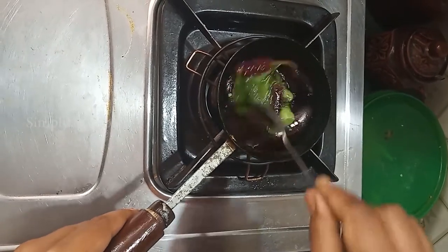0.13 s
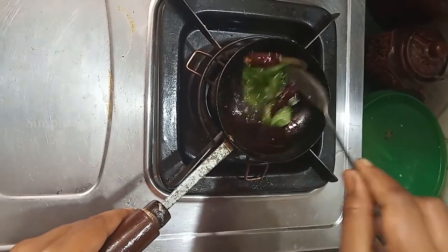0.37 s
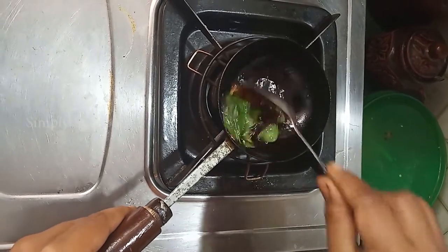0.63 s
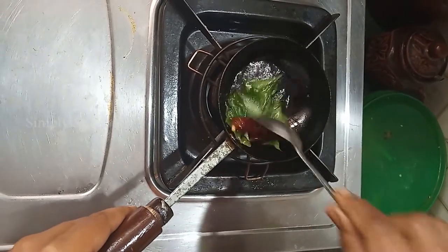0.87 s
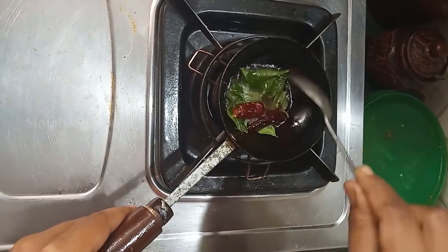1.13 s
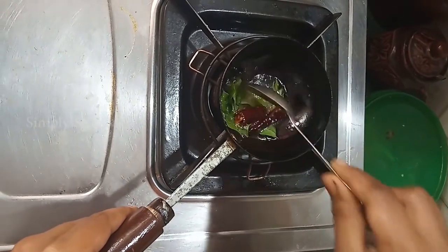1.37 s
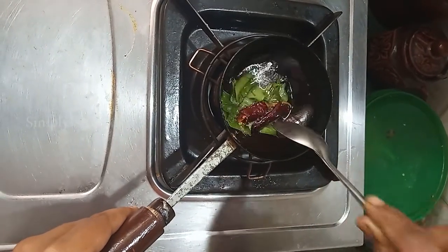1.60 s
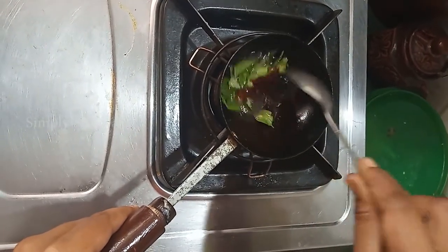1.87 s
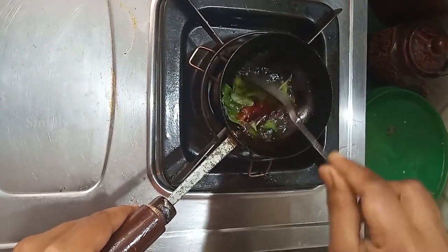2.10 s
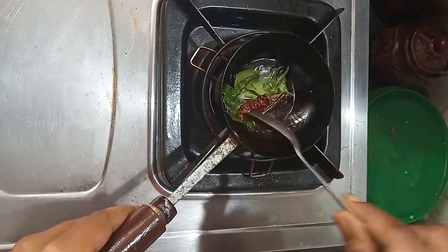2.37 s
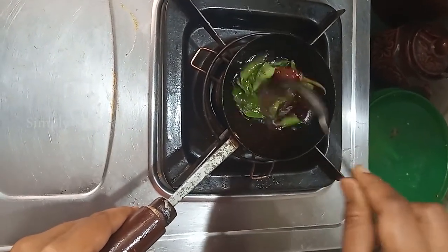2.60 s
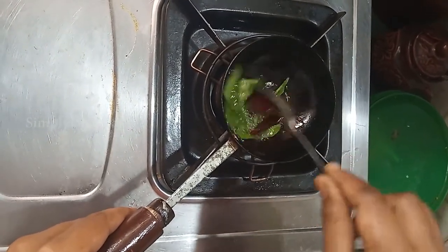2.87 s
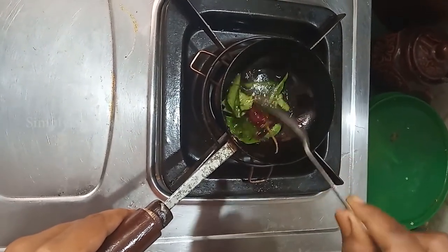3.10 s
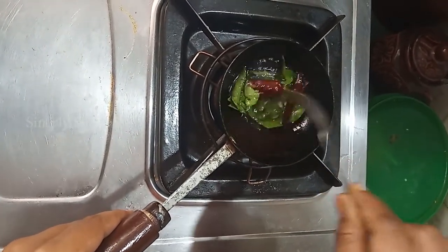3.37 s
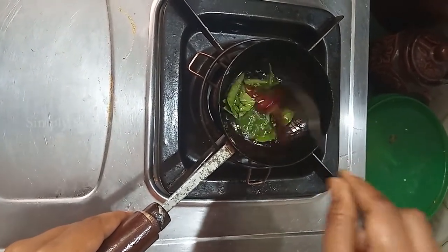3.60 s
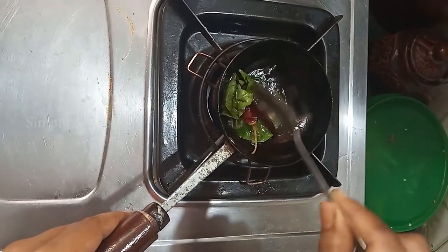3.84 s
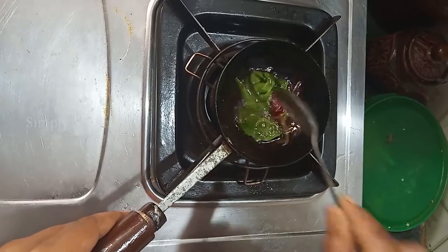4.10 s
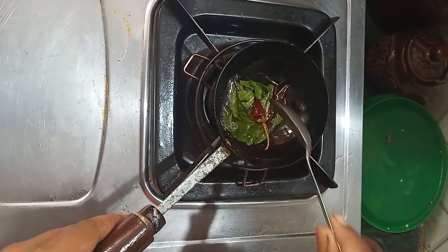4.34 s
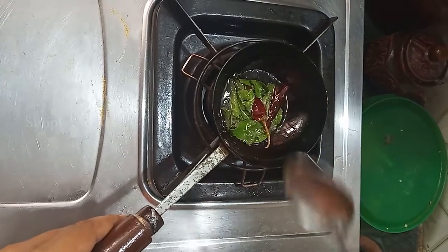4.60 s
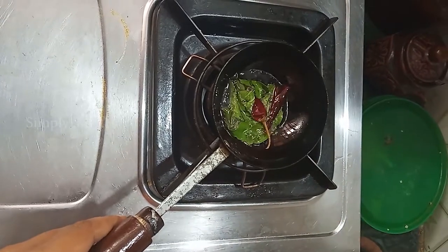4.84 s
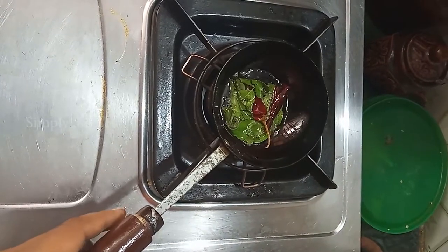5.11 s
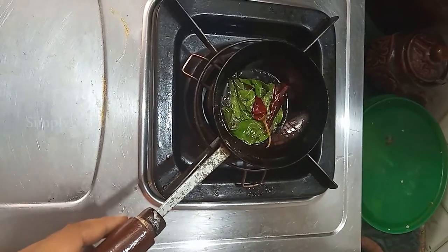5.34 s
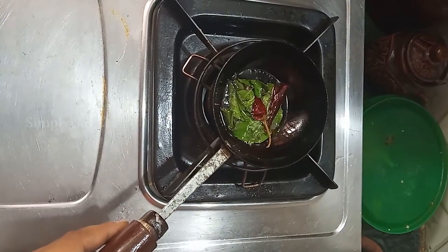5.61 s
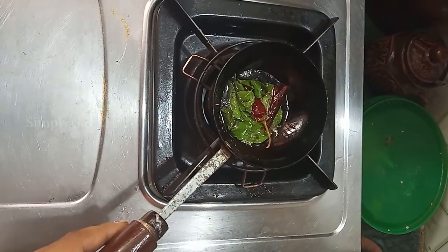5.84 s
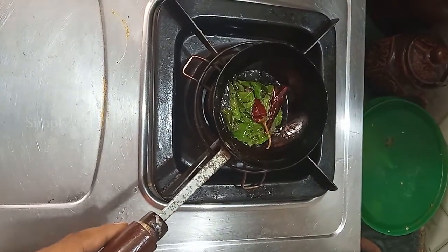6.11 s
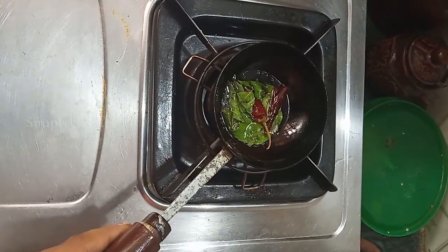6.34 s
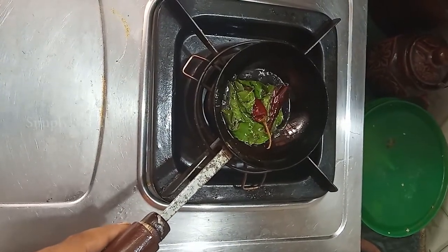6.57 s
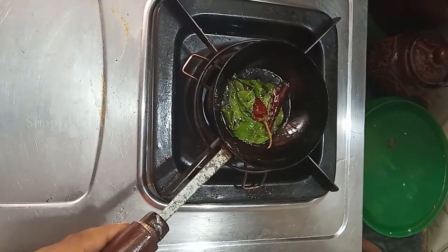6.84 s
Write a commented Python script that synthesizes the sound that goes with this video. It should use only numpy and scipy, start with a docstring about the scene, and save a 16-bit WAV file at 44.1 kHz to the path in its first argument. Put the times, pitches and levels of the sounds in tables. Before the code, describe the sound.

Close to a small metal pan in a home kitchen, hot oil hisses and crackles throughout. From 0 s a spoon knocks and rubs the pan, with short dull rings, while a far bird hoots and a low motor hum wavers below. The sizzle flares with each stir, most strongly around 0.8, 1.1 and 1.6 s, where loud, sharp water pops burst. A bigger bird's gliding whistle peaks at 2.0 s, returning near 4.7 and 6.7 s. From 2.6 to 4.6 s a songbird repeats a rapid four-note phrase about every 0.3 s, with soft outdoor echoes. Flares and knocks lessen after 3.5 s; the last sizeable swell is near 3.9 s. Then the frying thins to light hiss and separate crisp pops, strong around 5.7 to 5.8 and 6.5 s, with two small knocks near 6.0 s. Noise suppression dulls faint sounds.

```python
"""Leaves and chillies fry in a small steel pan throughout: merged grains of noise hiss, cracks and splashes pop.
From the first moment a spoon knocks the pan's ringing modes, a motor tone hums and a far bird hoots.
From about 1.7 s, topping at 2.0 s, a larger bird gives the first of three long gliding whistles; from 2.6 s to
4.6 s a songbird repeats a four-note phrase of gliding sines. More hoots and two short arched whistles sound during
the song and after it; pops run to the end. The microphone's noise suppressor turns down whatever is faint."""
import sys
import numpy as np
from scipy import signal
from scipy.io import wavfile

SR = 44100
rng = np.random.default_rng(int(sys.argv[2]) if len(sys.argv) > 2 else 0)


def generate_wav(sig):
    """Save sig (samples, or channels by samples) to the path in sys.argv[1] as 16-bit PCM at SR."""
    pcm = np.round(np.clip(np.atleast_2d(sig).T, -1, 1) * 32767).astype(np.int16)
    wavfile.write(sys.argv[1], SR, pcm)


def makeup_ratio(level_db):
    """Linear amplitude ratio for a level in decibels (20 dB per factor of ten)."""
    decades = np.asarray(level_db, float) / 20
    return 10 ** decades


N = 306936


def in_time(rows):
    """Columns of a time curve, one value a sample."""
    time, *columns = np.transpose(rows)
    return [np.interp(np.arange(N) / SR, time, column) for column in columns]


def rms_one(x):
    """Scale to rms 1."""
    return x / np.sqrt(np.mean(x ** 2) + 1e-20)


def band(x, low_hz, high_hz):
    """Butterworth band-pass."""
    return signal.sosfilt(signal.butter(2, [low_hz, high_hz], "band", fs=SR, output="sos"), x + 1e-18)


def drift(rate_hz):
    """Smooth random wandering of rms 1: noise low-passed around rate_hz, drawn every 40 samples."""
    r = np.exp(-80 * np.pi * rate_hz / SR)
    noise = rng.standard_normal(N // 40 + 2002)
    slow = signal.lfilter([1], [1, -2 * r, r * r], noise)[2000:]      # skip the filter's start
    return np.interp(np.arange(N) / 40, np.arange(len(slow)), rms_one(slow))


def train(times, gains):
    """Clicks of given heights."""
    out = np.zeros(N)
    np.add.at(out, np.clip((np.asarray(times) * SR).astype(int), 0, N - 1), gains)
    return out


def dying(clicks, t60):
    """Envelope that jumps at each click and falls 60 dB in t60 seconds."""
    return signal.lfilter([1], [1, -makeup_ratio(-60 / (t60 * SR))], clicks + 1e-18)


def coloured(source, spectrum, patchy_db):
    """Third-octave bands of a two-row source, each with its level and its own flicker; (centre Hz, band) pairs."""
    hz, level_db = np.transpose(spectrum)
    edges = hz[0] * 2 ** (np.arange(0, 3 * np.log2(hz[-1] / hz[0]) + 1) / 3)
    for k, (low, high) in enumerate(zip(edges, edges[1:])):
        mid = np.sqrt(low * high)
        flicker_db = patchy_db * (drift(1.0) + 1.09 * drift(13.0))
        gain_db = np.interp(np.log(mid), np.log(hz), level_db) + flicker_db
        yield mid, makeup_ratio(gain_db) * band(source[k % 2], low, high)


def tone(hz, gain):
    """Sine on a pitch curve; gain is its rms."""
    return np.sqrt(2) * gain * np.sin(2 * np.pi * np.cumsum(hz) / SR)


def add_note(out, start, end, first_hz, last_hz, level_db, fade_db=0, *, soft):
    """Add one gliding sine with rounded ends; a larger soft rounds it more."""
    a, b = int(start * SR), int(end * SR)
    u = np.linspace(0, 1, b - a)
    hz = first_hz + (last_hz - first_hz) * u * u * (3 - 2 * u)
    out[a:b] += tone(hz, makeup_ratio(level_db + fade_db * u) * np.sin(np.pi * u) ** soft)


def yard(x, t60):
    """Echoes outdoors: decaying noise of energy 1 that fades in over 3.3 ms."""
    t = np.arange(SR) / SR
    tail = rng.standard_normal(SR) * makeup_ratio(-60 * t / t60) * np.clip(t / 0.0033, 0, 1)
    return signal.fftconvolve(x, tail / np.sqrt(np.sum(tail ** 2)))[:N]


def room_floor():
    """Steady noises: dull room tone, broad microphone noise and the bright hiss of the gas flame."""
    room_db, microphone_db, flame_db = -76.5, -72, -59
    room = rms_one(band(rng.standard_normal(N), 270, 1400))
    flame = rms_one(band(rng.standard_normal(N), 5200, 0.45 * SR))
    return makeup_ratio(room_db) * room + makeup_ratio(microphone_db) * rng.standard_normal(N) + makeup_ratio(flame_db) * flame


# motor tone, carrying its rumble along: (time [s], level [dB])
HUM_LEVEL = [(0.0, -53), (0.62, -50.5), (1.96, -62.5), (2.05, -51), (2.91, -56), (2.98, -81), (3.1, -50.5),
             (3.16, -63), (3.51, -46), (3.7, -60), (4.3, -56.5), (5.18, -75), (5.45, -61), (5.54, -76.5),
             (6.07, -50), (6.16, -72), (6.36, -57.5), (6.96, -59)]
# motor overtones, independent of that level: (centre [Hz], level [dB])
HUM_OVERTONES = [(128, -91), (310, -92), (440, -87)]


def hum():
    """A motor tone wavering in pitch and strength over low rumble, with faint overtones."""
    pitch_hz, waver_hz, rumble_db = 65.3, 4.3, -7
    line = tone(pitch_hz + waver_hz * drift(7), 1 + .4 * drift(6))
    rumble = rms_one(band(band(rng.standard_normal(N), 39, 120), 29, 100))
    overtones = sum(tone(hz + 8.5 * drift(2.0), makeup_ratio(db + drift(5))) for hz, db in HUM_OVERTONES)
    return makeup_ratio(in_time(HUM_LEVEL)[0]) * (line + makeup_ratio(rumble_db) * rumble) + overtones


# far hoots, before their flutter: (start [s], end [s], first pitch [Hz], last pitch [Hz], level [dB])
FAR_HOOTS = [(.03, 0.503, 878, 711, -57), (2.885, 3.038, 740, 693, -68), (3.191, 3.426, 596, 610, -63.5),
             (3.5, 3.74, 826, 791, -71), (3.783, 3.86, 1077, 1104, -70), (3.888, 3.979, 613, 827, -64),
             (5.263, 5.363, 767, 742, -72), (5.326, 5.45, 1616, 1570, -81), (6.203, 6.253, 620, 655, -71.5),
             (6.314, 6.472, 737, 763, -71), (6.608, 6.726, 753, 723, -68)]


def far_hoots():
    """Far birds: near-pure gliding notes that flutter on the way and echo in the yard."""
    hoots = np.zeros(N)
    for hoot in FAR_HOOTS:
        add_note(hoots, *hoot, soft=0.18)
    hoots *= makeup_ratio(4.6 * drift(25))
    return hoots + makeup_ratio(-6) * yard(hoots, t60=.4)


# long whistle, held low, climbing and dropping: (time from top [s], pitch against top [ratio], rel. level [dB])
WHISTLE_SHAPE = [(-.33, 0.83, -39), (-.25, .83, -10), (-.13, .83, -7.5), (-.06, .91, -8), (0, 0.98, -1.5),
                 (0.051, .99, -5), (0.127, .79, -9.5), (.15, 0.71, -28.5)]
# each long whistle: (time of top [s], reference pitch [Hz], level [dB])
LONG_CALLS = [(2.002, 1625, -41), (4.719, 1592, -42.5), (6.683, 1634, -41.5)]
# short arched whistles: (start [s], end [s], foot pitch [Hz], top pitch [Hz], level [dB])
ARCHED_CALLS = [(3.049, 3.256, 1277, 1400, -63.5), (6.085, 6.288, 1260, 1405, -59)]


def whistling_bird():
    """A larger bird: fluttering sines on curved pitches, smeared by the echoes of the yard."""
    calls, t = np.zeros(N), np.arange(N) / SR
    after, pitch, shape_db = np.transpose(WHISTLE_SHAPE)
    for top, top_hz, level_db in LONG_CALLS:
        sounding = (t > top + after[0]) & (t < top + after[-1])
        hz = top_hz * np.interp(t - top, after, pitch)
        call_db = level_db + np.interp(t - top, after, shape_db) + 2.5 * drift(34)
        calls += tone(hz, sounding * makeup_ratio(call_db))
    for start, end, foot_hz, top_hz, level_db in ARCHED_CALLS:
        arch = np.sin(np.pi * np.clip((t - start) / (end - start), 0, 1))
        gain = np.abs(arch) ** 0.22 * makeup_ratio(level_db + 3.0 * drift(57))
        calls += tone(foot_hz + (top_hz - foot_hz) * arch, gain)
    return calls + makeup_ratio(-2.5) * yard(calls, t60=1)


# one phrase, timed from its falling note, pitches before a small chance bend:
# (start [s], end [s], first pitch [Hz], last pitch [Hz], rel. level [dB], level change over the note [dB])
PHRASE_NOTES = [(-.115, -0.077, 2723, 2856, -12, 3), (-.072, -0.036, 3793, 3650, -2, -4),
                (-.035, -0.004, 4524, 4460, -4, 0), (.002, 0.041, 6520, 3084, 14, -16)]
# each phrase: (time [s], level [dB])
PHRASE_TIMES = [(2.602, -49.5), (2.874, -48.5), (3.154, -45.5), (3.435, -44.5), (3.716, -49),
                (4.005, -47.5), (4.3, -50.5), (4.591, -51)]


def songbird():
    """Four gliding sines a phrase, varied slightly each time, with a quick flutter and the echoes of the yard."""
    song = np.zeros(N)
    for at, level_db in PHRASE_TIMES:
        for start, end, first_hz, last_hz, note_db, fade_db in PHRASE_NOTES:
            louder_db, bend = rng.normal(0, 1), 1 + 0.004 * rng.normal(0, 1)
            add_note(song, at + start, at + end, first_hz * bend, last_hz * bend,
                     level_db + note_db + louder_db, fade_db, soft=0.41)
    song *= makeup_ratio(3.5 * drift(150))
    return song + yard(song, t60=0.4)


# the rubbing through pan and grate: (time [s], level [dB])
STIR_LEVEL = [(0.0, -48.5), (0.17, -62), (0.87, -54), (1.16, -68), (1.3, -93), (1.61, -69), (1.74, -58.5),
              (2.54, -78), (3.25, -84), (3.41, -65.5), (3.55, -50), (3.68, -79.5), (5.21, -92.5),
              (5.8, -93.5), (6.09, -82), (6.96, -93)]
# its colour: (frequency [Hz], relative level [dB per Hz])
STIR_SPECTRUM = [(110, -7), (200, -11.5), (320, 1.5), (450, -13), (600, -10), (900, -5), (1300, -22.5)]


def stirring():
    """Dull rubbing through the pan: low coloured noise with flickering bands."""
    bands = coloured(rng.standard_normal((2, N)), STIR_SPECTRUM, patchy_db=3.0)
    return makeup_ratio(in_time(STIR_LEVEL)[0]) * rms_one(sum(x for hz, x in bands))


# spoon on pan: (time [s], relative level [dB], brightness [dB per octave], ring time [share of free t60],
# cut off after [s], thud against the blow [dB], favoured frequency [Hz], favour [dB])
SPOON_KNOCKS = [(0.002, -45.5, -16, 0.73, 0.11, -25, 252, 30.5),
                (0.074, -29, -11.5, 0.32, 0.065, -18, 318, 3.5), (0.15, -39.5, -13, .5, .16, 1.5, 621, 28),
                (0.397, -38.5, -4.5, 0.45, .3, 7.5, 422, 18), (0.468, -30.5, -4.5, 1.02, .29, 6, 553, 15.5),
                (0.536, -40, -7, 1.12, 0.12, -4, 553, 19), (0.792, -25.5, -1, 0.77, .31, -5, 720, -0.5),
                (0.848, -51.5, -13.5, 0.32, .08, -20, 127, 26), (1.2, -57, -11, 1.6, 0.11, -20, 318, 5),
                (1.575, -30.5, -6.5, 0.89, .4, 6.5, 127, 11),
                (1.589, -47.5, -2.5, 1.2, 0.13, -8, 694, 14.5), (1.74, -49, -4, .5, 0.083, -13, 553, 12),
                (2.004, -33, -7, 0.53, .24, -4.5, 240, 18.5),
                (2.336, -47.5, -10, 0.2, 0.026, -10.5, 318, 6), (2.373, -55, -7, .8, 0.15, 13, 243, 40.5),
                (2.438, -37.5, -18, 0.19, 0.054, -17, 422, 13),
                (2.744, -41.5, -9.5, 0.72, 0.064, 2.5, 1030, 27),
                (2.801, -51, 3, 0.87, 0.15, 13.5, 237, 39), (2.84, -54.5, 0, 0.91, .1, -1, 422, 29),
                (3.426, -39, -5.5, 0.95, 0.11, 1.5, 412, 34.5), (3.47, -47, -1, 1.3, 0.1, 6, 422, 29),
                (4.759, -72, -9, 0.52, .1, -6, 243, 36.5), (6.023, -43, -8, 0.74, 0.13, -5, 546, 21),
                (6.06, -49.5, -4.5, 1.16, 0.1, 0, 318, 2.5)]
# modes of pan and grate: (frequency [Hz], relative level [dB], free t60 [s])
PAN_MODES = [(127, -11, 0.4), (243, -21.5, 0.5), (318, 8, 0.75), (358, -15, 0.15), (422, -12, 0.08),
             (490, -5, 0.12), (553, -1, .22), (694, 2, 0.24), (788, 1.5, 0.2), (1030, -14, 0.3),
             (1642, 8, 0.13), (1707, 0, 0.2), (1985, -6, 0.3), (2105, -10, 0.3), (2401, -10, .3),
             (2751, -1, 0.15), (2830, -6, 0.2), (3100, -3, 0.17)]


def knocks():
    """Each blow strikes every mode, most those near its favoured spot; each ring breaks off after its own time."""
    favour_octaves, rise_cycles, cut_fade_s = .15, 4.0, .012
    contact_t60, thud_t60, thud_rise_s = 0.03, 0.2, 0.056
    wobble_db, wobble_rad = 1.2, .9      # per octave: a random wobble roughens the higher modes most
    out, t = np.zeros(N + SR), np.arange(SR // 2) / SR
    hz, mode_db, t60 = np.transpose(PAN_MODES)[:, :, None]
    octaves = np.log2(hz / 220).clip(.45)
    for at, level_db, bright_db, free, cut_after, thud_db, spot_hz, spot_db in SPOON_KNOCKS:
        knots = rng.standard_normal((2, len(hz), 36))
        sway, shift = octaves * np.array([[np.interp(t, np.linspace(0, .5, 36), k) for k in rows]
                                          for rows in knots])
        favour_db = spot_db * np.exp(-.5 * (np.log2(hz / spot_hz) / favour_octaves) ** 2)
        luck_db = rng.normal(0, 2, hz.shape) * octaves.clip(0, 1)
        strike_db = level_db - 8.0 + mode_db + favour_db + bright_db * np.log2(hz / 318) + luck_db
        gains = makeup_ratio(strike_db - 60 * t / (t60 * free))
        gains = gains * (1 - np.exp(-t * hz / rise_cycles)) * makeup_ratio(wobble_db * sway)
        ring = np.sum(gains * np.sin(2 * np.pi * hz * t + wobble_rad * shift), axis=0)
        # first touch, then bright chatter
        chatter = band(rng.standard_normal(len(t)), 900, 9000) * makeup_ratio(-12.5 - 60 * t / contact_t60)
        ring = signal.fftconvolve(ring, chatter + (t == 0))[:len(t)]
        # modes too close to tell apart
        dense = rms_one(band(band(rng.standard_normal(len(t)), 200, 900), 170, 600))
        swell = makeup_ratio(level_db + thud_db - 60 * t / thud_t60) * np.clip(t / thud_rise_s, 0, 1)
        cut = np.exp(-np.maximum(t - cut_after, 0) / cut_fade_s)
        first = int(at * SR)
        out[first:first + len(t)] += (ring + swell * dense) * cut
    return out[:N]


# steady frying between strokes, middle range before its lift:
# (time [s], level [dB], tilt from one range to the next higher [dB])
STEADY_FRYING = [(0.0, -56, -4), (0.73, -64, -10), (0.97, -56.5, -4), (1.61, -66.5, -5), (1.76, -66.5, -13),
                 (1.94, -58, 6), (2.11, -73.5, -3.5), (2.4, -59, -6.5), (2.56, -57.5, -2.5),
                 (2.77, -62.5, -7.5), (3.16, -64, -6.5), (3.88, -62.5, -4.5), (4.15, -66, -10.5),
                 (4.25, -73.5, -1.5), (4.4, -75.5, -8.5), (4.73, -66.5, -4.5), (5.1, -67, -2.5),
                 (5.15, -74.5, 1), (5.33, -73.5, 2), (5.38, -65, -3), (5.52, -69.5, 6), (5.6, -67.5, -5),
                 (5.85, -72.5, -12.5), (6.55, -67, -4.5), (6.96, -64.5, -3)]
# the spoon turns wet leaves into the oil and the sizzle flares; middle range before rise and lift:
# (time [s], level [dB], tilt from one range to the next higher [dB])
SIZZLE_FLARES = [(0.074, -50, -6.5), (0.475, -47, -0.5), (0.785, -38.5, -8), (1.135, -42.5, -1),
                 (1.397, -72, 10), (1.584, -35.5, -12), (1.863, -67, -21), (1.984, -39.5, -6),
                 (2.388, -45.5, 2.5), (2.752, -46.5, -3), (3.104, -50, -4.5), (3.443, -57, -20.5),
                 (3.844, -44, -3), (4.418, -65, 1)]
# the steady frying's top range: (time [s], level [dB])
TREBLE_LEVEL = [(0.0, -49.5), (0.56, -68), (0.68, -53.5), (0.85, -59), (1.49, -68.5), (1.84, -66),
                (2.13, -65), (2.27, -56.5), (2.64, -66), (2.87, -63.5), (4.5, -62.5), (4.67, -79.5),
                (4.84, -59.5), (5.48, -80), (6.05, -65.5), (6.96, -66.5)]


def vigour():
    """Gains of the low, middle, high and top sizzle: steady frying plus flares that rise softly and die away."""
    rise_s, flare_t60, middle_lift_db, treble_flare_db = 0.025, 0.15, 6.5, 5.5
    level_db, tilt_db = in_time(STEADY_FRYING)
    at, flare_db, flare_tilt_db = np.transpose(SIZZLE_FLARES)
    slow = np.exp(-1 / (rise_s * SR))
    for k in (-1, 0, 1):
        flare = dying(train(at, makeup_ratio(flare_db + k * flare_tilt_db)), flare_t60)
        flare = signal.lfilter([1 - slow], [1, -slow], flare)
        lift = makeup_ratio(middle_lift_db * (k == 0))
        yield lift * (makeup_ratio(level_db + k * tilt_db) + flare)
    yield makeup_ratio(in_time(TREBLE_LEVEL)[0]) + makeup_ratio(treble_flare_db) * flare      # follows the high range's flare


# colour of the sizzle inside each range: (frequency [Hz], relative level [dB per Hz])
SIZZLE_SPECTRUM = [(900, 0), (1300, -13.5), (1700, 11), (2300, -4), (3000, 5.5), (4500, -5), (6300, 12),
                   (7000, -44.5), (10000, -5), (14000, -10.5), (16000, -11)]


def sizzle(gains):
    """Thousands of tiny bursts a second merge into hiss; small spits stand out, each in a range of its own."""
    grains_per_s, spits_per_s, spit_size, spit_t60 = 2500, 90, .9, .03
    sizes = makeup_ratio(4.85 * np.minimum(rng.exponential(1, (2, N)), 3.5)) * rng.choice([-1, 1], (2, N))
    grains = rms_one(sizes * (rng.random((2, N)) < grains_per_s * makeup_ratio(2 * drift(20)) / SR))
    source = grains + .9 * rng.standard_normal((2, N))
    spits = (rng.random(N) < spits_per_s / SR) * makeup_ratio(4.5 * np.minimum(rng.exponential(1, N), 2))
    centre = rng.uniform(np.log(1500), np.log(13000), N)
    reach = rng.uniform(0.49, 0.57, N)      # in natural log of frequency
    parts = np.zeros((4, N))
    for hz, x in coloured(source, SIZZLE_SPECTRUM, patchy_db=2.8):
        near = np.abs(np.log(hz) - centre) < reach
        part = int(hz > 3000) + int(hz > 6800) + int(hz > 9500)
        parts[part] += x * (1 + spit_size * dying(spits * near, spit_t60))
    return sum(gain * rms_one(part) for gain, part in zip(gains, parts))


# water bursting in the oil: (time [s], level [dB], centre [Hz], width [octaves], never under 0.15 in use)
WATER_POPS = [(0.0663, -33, 3450, 0.26), (0.084, -32, 3450, 0.3), (0.067, -39, 10800, .15),
              (0.129, -38, 11000, 0.24), (0.432, -38.5, 11000, 0.57), (0.481, -35, 6960, 0.28),
              (0.508, -52, 12000, .3), (0.203, -35, 6700, 0.77), (0.2187, -19.5, 6260, 0.66),
              (0.2451, -30, 3720, 0.67), (0.291, -32.5, 5350, 0.47), (0.398, -18.5, 2360, 1),
              (0.52, -33.5, 10850, 0.62), (0.544, -39.5, 9400, 0.2), (0.7042, -27, 3160, 0.97),
              (0.7399, -27, 4900, 0.4), (0.791, -11.5, 2300, 1), (0.92, -27.5, 6000, 0.4),
              (1.026, -32, 2880, 0.23), (1.0685, -22.5, 3200, 0.77), (1.1412, -14.5, 2190, 1),
              (1.186, -40, 1660, 0.077), (1.213, -37, 1720, 0.13), (1.194, -40, 11700, 0.17),
              (1.26, -28, 3880, 0.55), (1.3786, -33, 9050, 0.91), (1.4078, -27.5, 9900, 0.81),
              (1.5727, -8, 3230, 0.99), (1.635, -22.5, 4270, 0.44), (1.723, -24, 4370, 0.5),
              (1.7426, -21.5, 6250, 0.41), (1.7892, -21, 7670, 0.22), (1.8401, -24.5, 6530, 0.32),
              (1.8812, -21, 5830, 0.95), (2.0022, -25, 1660, 0.64), (2.0311, -27.5, 4000, 0.22),
              (2.079, -31, 2470, 0.73), (2.384, -30.5, 6600, 0.41), (2.419, -42.5, 1790, 0.25),
              (2.489, -44.5, 12900, 0.23), (2.627, -44.5, 10000, 0.63), (2.848, -46, 13600, 0.21),
              (2.99, -46, 9000, 0.45), (3.349, -49.5, 11000, 0.72), (2.531, -37, 3080, 0.4),
              (2.5829, -23, 5380, 0.47), (2.6728, -20, 5160, 0.49), (2.679, -27, 7100, 0.58),
              (2.741, -24, 1840, 0.98), (2.772, -27.5, 1940, 0.75), (3.213, -38, 8500, 0.47),
              (3.11, -31, 4200, 0.65), (3.372, -57, 3670, 0.38), (3.421, -32.5, 3120, 1),
              (3.4537, -25, 3530, 1), (3.83, -37.5, 7740, 0.34), (3.9163, -19.5, 5500, 0.24),
              (4.0539, -20.5, 5500, 0.39), (4.072, -35.5, 9200, 0.28), (4.085, -32.5, 8900, 0.95),
              (4.127, -28.5, 5450, 0.28), (4.1528, -31, 5840, 0.69), (4.332, -31.5, 3160, 0.71),
              (4.4166, -19, 2780, 0.79), (4.55, -34, 10400, 0.18), (4.5861, -33, 11400, 0.21),
              (4.673, -41, 6500, 0.16), (4.7333, -36, 8400, 0.5), (4.7474, -34, 10800, 0.23),
              (4.8109, -28.5, 6380, 0.55), (4.862, -27, 3000, 0.77), (5.0553, -34, 5930, 1),
              (5.254, -41.5, 4360, 0.16), (5.281, -47.5, 13350, 0.34), (5.409, -49, 9500, 0.22),
              (5.354, -47, 3310, 0.29), (5.5387, -39, 2830, 0.62), (5.613, -32, 4820, 0.77),
              (5.657, -17, 7580, 0.19), (5.6784, -19, 4270, 0.7), (5.824, -15.5, 7500, 0.9),
              (5.8615, -29, 8600, 0.63), (5.8857, -23, 2420, 1), (5.9326, -25.5, 7260, 0.59),
              (6.029, -26, 8440, 1), (6.062, -36, 8700, 0.19), (6.0978, -34.5, 4450, 0.8),
              (6.1481, -27.5, 4050, 0.23), (6.202, -36, 2950, 0.51), (6.2122, -40, 11900, 0.21),
              (6.2149, -25, 3470, 0.41), (6.292, -49, 3600, 0.57), (6.284, -50, 12000, 0.41),
              (6.253, -31.5, 6130, 0.22), (6.315, -37.5, 12000.0, 0.83), (6.359, -32, 4260, 0.24),
              (6.402, -46.5, 12100, 0.32), (6.446, -34, 7140, 0.1), (6.483, -12.5, 4600, 0.15),
              (6.59, -26, 3940, 0.53), (6.602, -41, 12200, 0.25), (6.658, -18, 6460, 0.13),
              (6.716, -40, 13500, 0.15), (6.789, -31, 7860, 0.083), (6.831, -53, 1960, 1),
              (6.9381, -31.5, 2640, 1)]
# how a burst sounds and dies by pitch: (frequency [Hz], crack level [dB], splash t60 [s], splash level [dB],
# kitchen t60 [s], kitchen level [dB])
POP_DECAYS = [(1840, -2, 0.0076, -6, 0.27, -18), (3800, 0.5, 0.033, -14, 0.36, -27.5),
              (8450, 1.5, 0.0075, -2, 0.11, -19.5), (12000, 15, 0.0064, -2, 0.1, -6)]


def pops():
    """A sharp crack, then the splash and the kitchen's tail; each burst fills a bell of pitches round its centre."""
    splash_lag_s = 0.0014
    at, level_db, centre_hz, width = np.transpose(WATER_POPS)
    hz, *laws = np.transpose(POP_DECAYS)
    edges, out = 1150 * 2 ** np.arange(0, 3.9, .38), np.zeros(N)
    mids = np.sqrt(edges[1:] * edges[:-1])
    bells = np.exp(-.5 * (np.log2(mids[:, None] / centre_hz) / np.maximum(width, .15)) ** 2)
    bells = bells * makeup_ratio(rng.normal(0, 2, bells.shape))
    bells = bells / np.sqrt(np.sum(bells ** 2, axis=0))
    for low, high, mid, bell in zip(edges, edges[1:], mids, bells):
        crack_db, splash_t60, splash_db, room_t60, room_db = (
            np.interp(np.log(mid), np.log(hz), law) for law in laws)
        heights = makeup_ratio(level_db) * bell
        late = train(at + splash_lag_s, heights)
        share = SR / 2 / (high - low)      # whole spectrum against this band
        crack = makeup_ratio(crack_db) * train(at, heights) * share      # a single pressure spike
        shape = makeup_ratio(splash_db) * dying(late, splash_t60) + makeup_ratio(room_db) * dying(late, room_t60)
        noise = rng.choice([-1, 1], N) * np.sqrt(share)      # about rms 1 inside the band
        out += band(band(crack + shape * noise, low, high), 0.38 * low, 1.12 * high)
    return out


# the bowl of the pan rings briefly with every burst: (frequency [Hz], width [Hz], level [dB])
BOWL_MODES = [(1738, 160, 6.5), (1900, 67, -12.5), (3070, 310, -5)]


def bowl(x):
    """Direct burst plus the broad resonances of the pan."""
    out = x.copy()
    for hz, width_hz, level_db in BOWL_MODES:
        r = np.exp(-np.pi * width_hz / SR)
        poles = [1, -2 * r * np.cos(2 * np.pi * hz / SR), r * r]
        out += makeup_ratio(level_db) * signal.lfilter([(1 - r * r) / 2, 0, (r * r - 1) / 2], poles, x)
    return out


# pan wall, hob and worktop throw the frying back: (delay [s], level against direct [dB])
NEAR_ECHOES = [(.0007, -17.5), (.0019, -27), (.0031, -30.5), (.0047, -30.5), (.0073, -12)]


def nearby(x):
    """Direct sound and a few short echoes, scaled to energy 1 together."""
    lags, levels_db = np.transpose(NEAR_ECHOES)
    taps = train(np.r_[0, lags], np.r_[1, makeup_ratio(levels_db)])[:SR // 50]
    return signal.fftconvolve(x, taps / np.sqrt(np.sum(taps ** 2)))[:N]


def scene():
    """All sources at one microphone."""
    background = room_floor() + hum() + far_hoots() + whistling_bird() + songbird()
    frying = nearby(bowl(pops()) + sizzle(vigour()))
    return (background + stirring() + knocks() + frying)[None]


# suppressor threshold: (frequency [Hz], level [dB per bin])
SUPPRESSOR_THRESHOLD = [(100, -100), (300, -94.5), (1000, -81.5), (2000, -82), (6000, -83), (12000, -81.5)]


def suppressor(x):
    """Each frequency bin is turned down as its recent power, averaged over several hops, nears the threshold."""
    deepest_db, memory = -15, .8      # memory: share of the old power kept at each hop of 256 samples
    hz, _, z = signal.stft(x, SR, nperseg=1024, noverlap=768)
    recent = signal.lfilter([1 - memory], [1, -memory], np.abs(z) ** 2)
    at, level_db = np.transpose(SUPPRESSOR_THRESHOLD)
    noise = makeup_ratio(np.interp(np.log(hz + 1), np.log(at), level_db))[:, None] ** 2
    gain = np.maximum(1 - noise / (recent + 1e-18), makeup_ratio(deepest_db))
    return signal.istft(z * gain, SR, nperseg=1024, noverlap=768)[1][..., :N]


def low_pass(x):
    """Removes everything above the highest recorded frequency."""
    return signal.sosfilt(signal.butter(12, 17000, fs=SR, output="sos"), x)


def record(dry):
    """The microphone rolls off at both ends; then its noise suppressor works."""
    x = signal.sosfilt(signal.butter(6, 16000, fs=SR, output="sos"), dry)
    x = signal.sosfilt(signal.butter(2, 48, "high", fs=SR, output="sos"), x)
    mix = suppressor(x)
    return low_pass(mix)


dry = scene()
out = record(dry)
generate_wav(out)
```